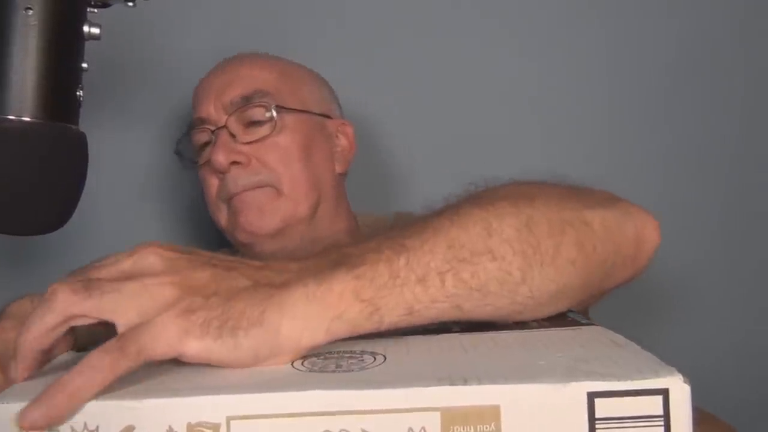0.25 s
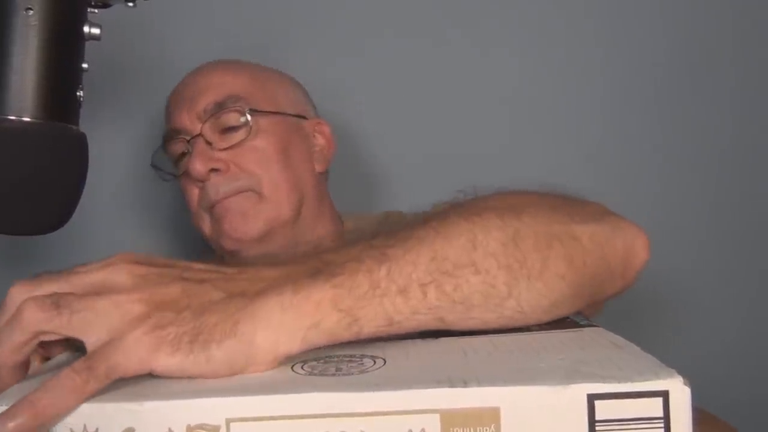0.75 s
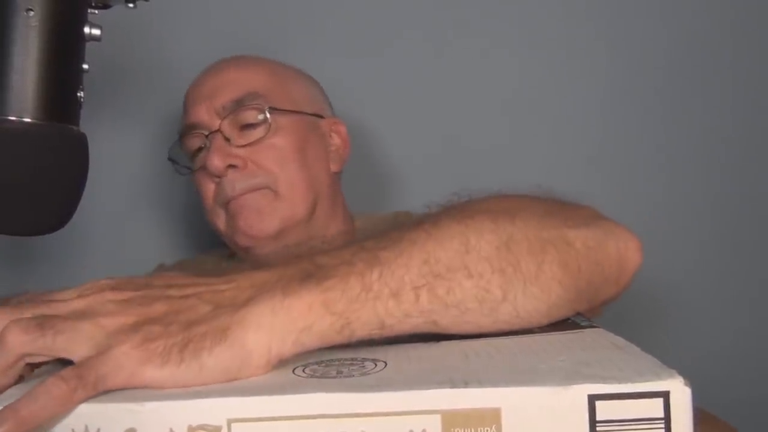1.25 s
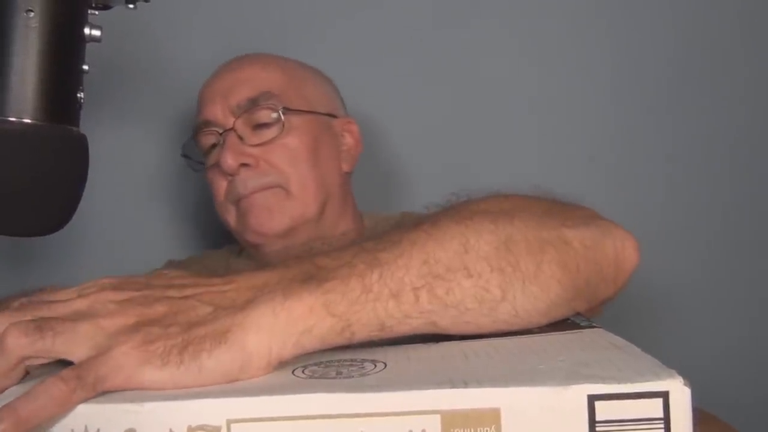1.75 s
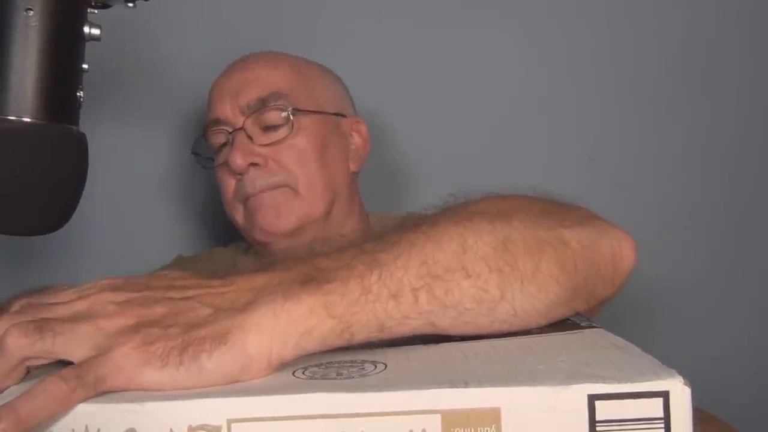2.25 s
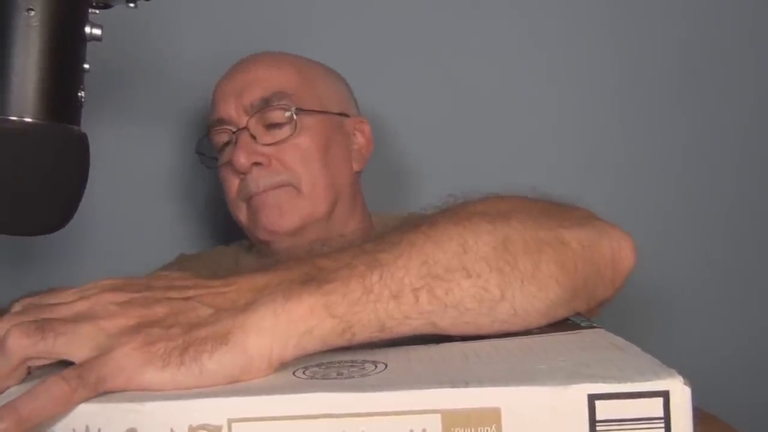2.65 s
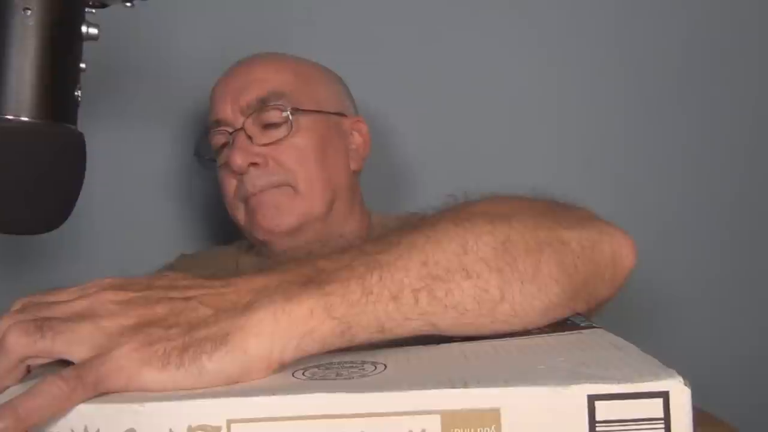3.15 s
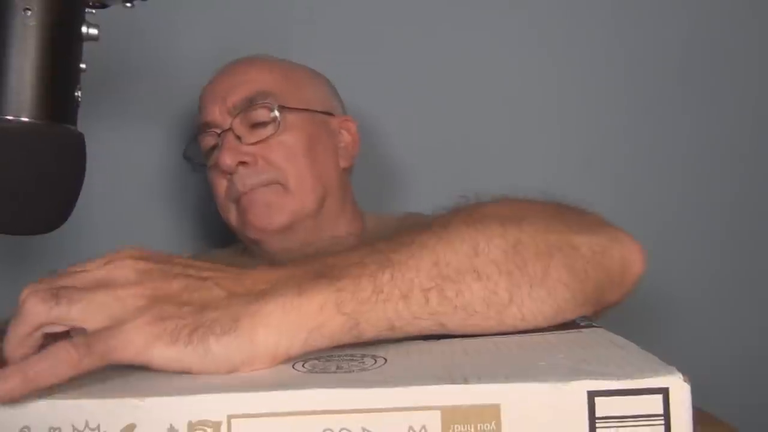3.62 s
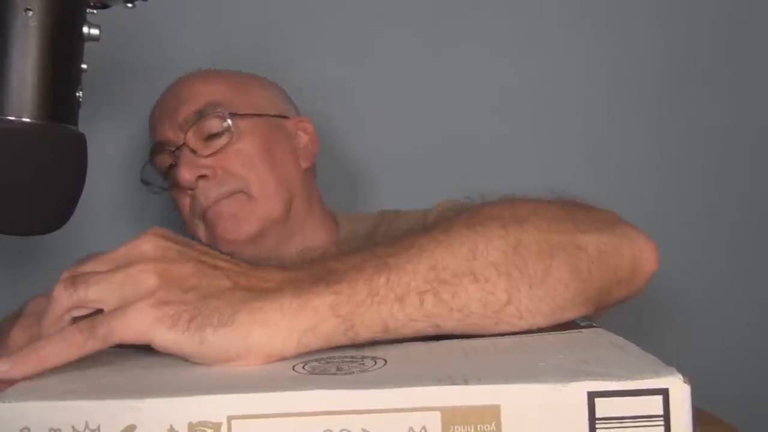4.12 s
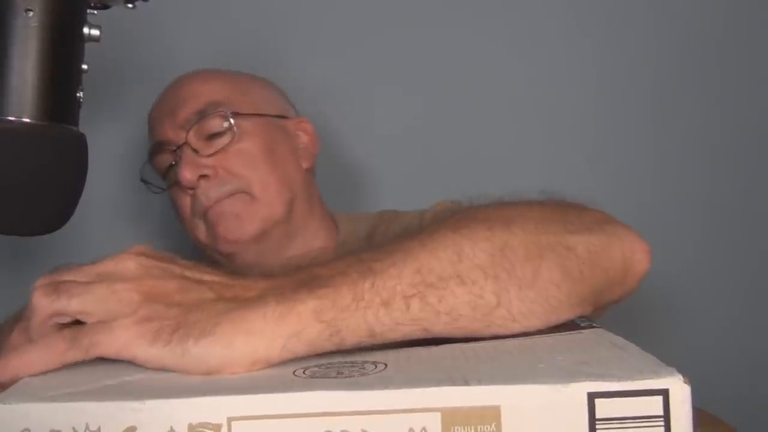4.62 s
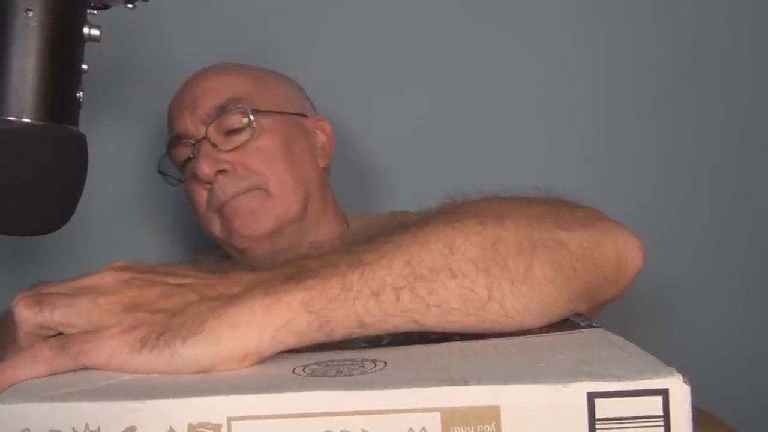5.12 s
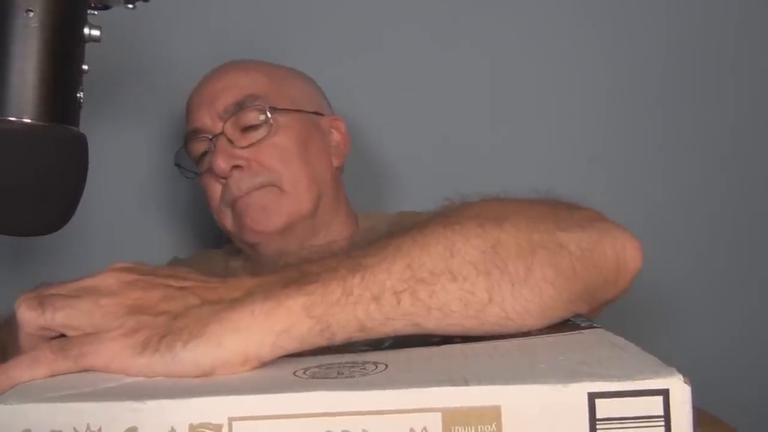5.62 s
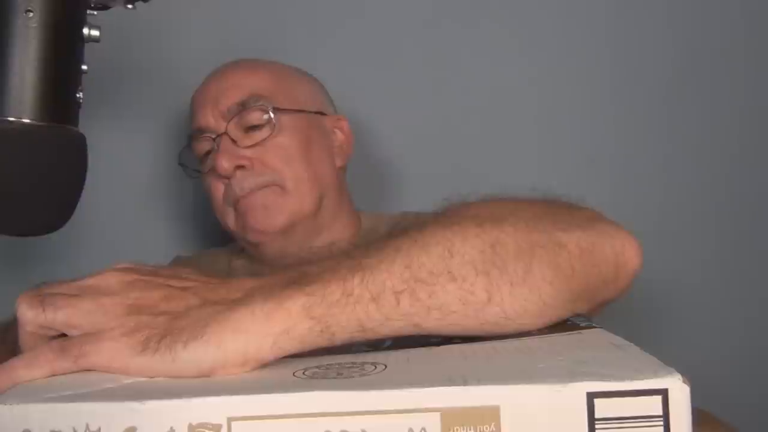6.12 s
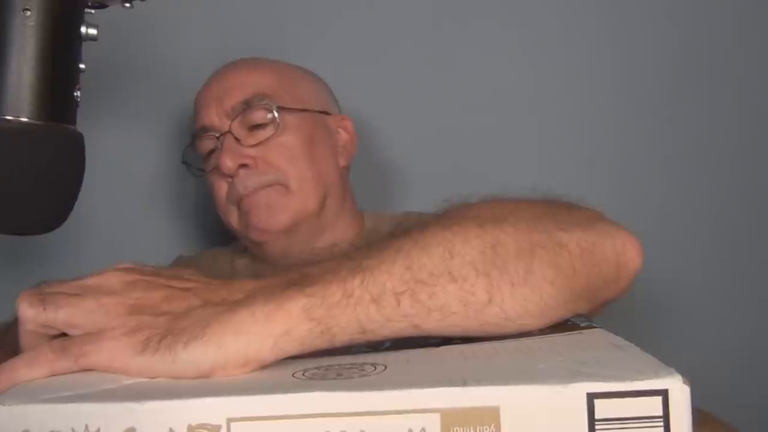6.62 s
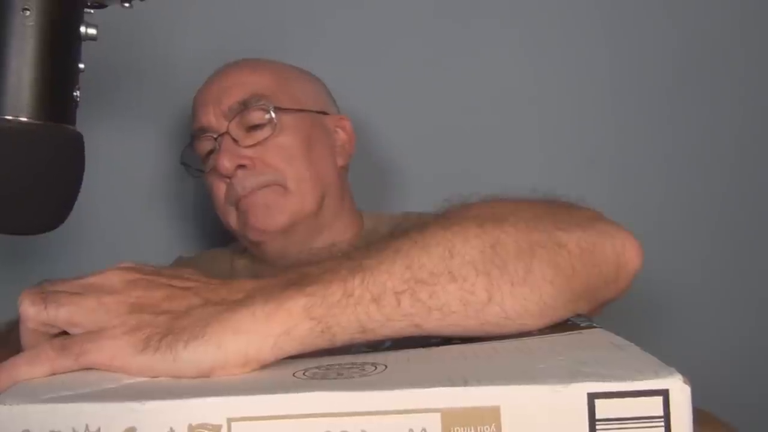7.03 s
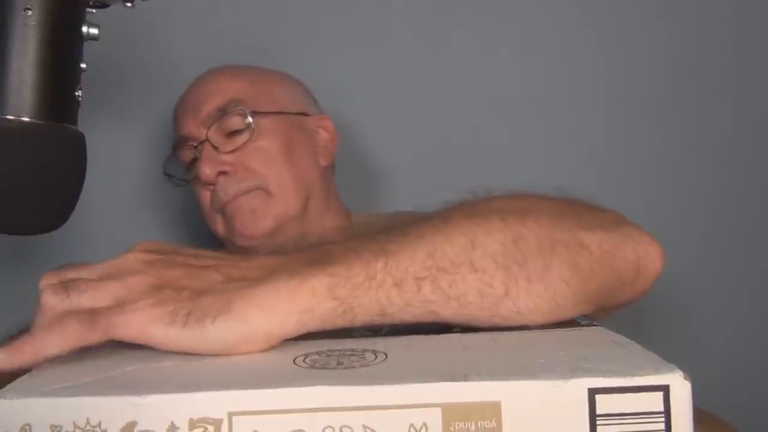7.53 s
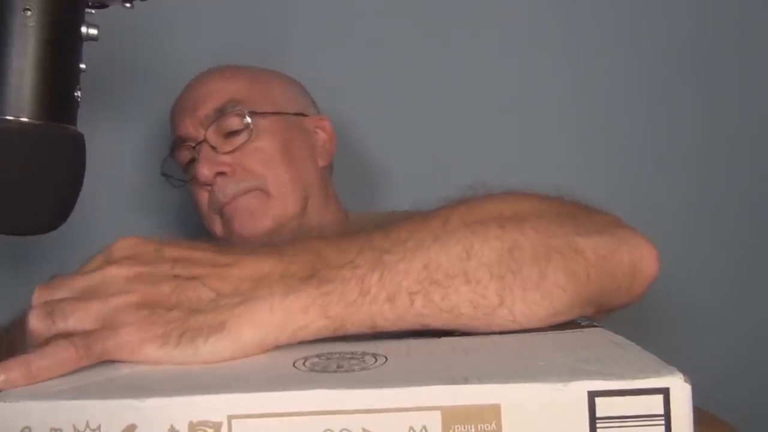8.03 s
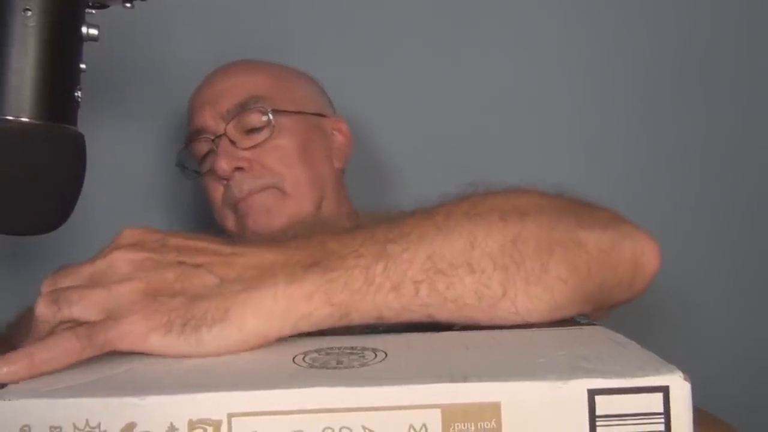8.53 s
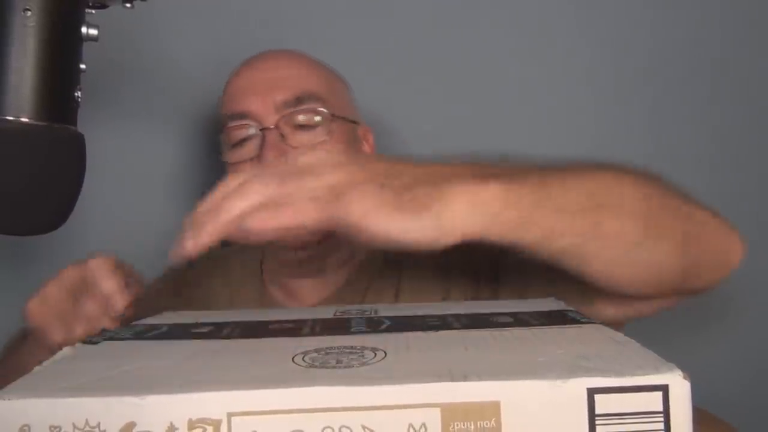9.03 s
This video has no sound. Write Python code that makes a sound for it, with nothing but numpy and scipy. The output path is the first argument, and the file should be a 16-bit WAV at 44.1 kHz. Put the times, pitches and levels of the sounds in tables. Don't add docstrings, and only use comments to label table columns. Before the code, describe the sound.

A close, dry sound of fingers on a corrugated cardboard box in a small quiet room, over faint low air noise and hiss. From 0 to 1.2 seconds, soft hollow fingertip taps fall in uneven clusters, with a firmer one near 0.8. At 1.44 a strong boxy knock lands, followed by grainy rubbing and fine nail ticks until about 3. Around 3.2 to 3.6 nails scrape across ridges, ending with a sharp bright click at 3.66. Sparse taps and quieter strokes follow from 4 to 5.4. Rubbing and crisp scratching grow busier from 5.5 to 7.5, with a tiny creak at 6.6 and bright fibre snaps around 7.05 and 7.14. Near 8 a pressed finger judders in a fast, strengthening stutter; at 8.14 the lid pops with one very loud, short boomy crack. Light taps, ticks and soft rubbing trail off through 9.3.

```python
import sys
import numpy as np
from scipy import signal
from scipy.fft import rfft, irfft, next_fast_len
from scipy.io import wavfile
from scipy.ndimage import uniform_filter1d

SR = 44100
rng = np.random.default_rng(int(sys.argv[2]) if len(sys.argv) > 2 else 0)


def elevation(decibels):
    levels = np.asarray(decibels, float)
    return 10 ** (levels / 20)


def waveform_to_disk(signal):
    frames = np.transpose(np.atleast_2d(signal))
    scaled = np.clip(frames, -1, 1) * 32767
    samples = np.round(scaled).astype(np.int16)
    wavfile.write(sys.argv[1], SR, samples)


N = 408807

# freq_hz, level_db_per_hz
AIR_SPECTRUM = [(20, 0.5), (55, -14), (108, -2.5), (174, -22.5), (240, -18.5), (1200, -32.5), (3000, -39),
                (15500, -48.5), (15900, -76.5)]
AIR_DB = -53.5
# freq_hz, level_db
WHINE = [(15628, -78), (15680, -76.5)]

# time_s, level_db
REST = [(0, -46.5), (0.5, -55.5), (1.3, -39), (1.6, -45), (2.0, -44), (2.5, -57.5), (2.95, -48.5),
        (3.5, -42.5), (4.05, -57.5), (4.5, -54), (4.8, -70), (5.3, -49.5), (5.7, -64), (6.1, -49.5),
        (7.1, -53.5), (7.65, -49), (8.6, -53), (9.05, -70.5)]
REST_RASP_DB, REST_HISS_DB = -21.5, -27
# peak_s, rise_s, fall_s, rasp_db, pad_over_nail_db
DRAGS = [(0.08, 0.078, 1, -58, -9), (0.364, 0.03, 1, -60, 9.5), (0.828, 0.14, 0.11, -53, 22),
         (1.078, 0.15, 0.12, -58, 21.5), (1.455, 0.078, 0.12, -43, 14), (1.671, 0.062, 0.26, -43.5, 7.5),
         (2.491, 0.14, 0.075, -49, 7.5), (3.212, 0.13, 0.39, -48, 7.5), (3.664, 0.041, 0.087, -41.5, 13),
         (3.93, 0.59, 0.1, -56, -30), (4.415, 0.056, 0.18, -54.5, 9.5), (4.899, 0.13, 0.34, -52, 13.5),
         (5.108, 0.026, 0.27, -49, 6), (5.518, .13, 0.075, -38, 5.5), (5.841, 0.093, 0.1, -35.5, 6),
         (6.174, 0.047, 0.16, -45, -4), (6.443, 0.084, 0.18, -47.5, 10), (6.698, 0.13, 0.12, -37, 9.5),
         (7.205, 0.049, 0.059, -43.5, 6.5), (7.443, 0.047, 0.28, -57.5, -2),
         (7.827, 0.22, 0.51, -59.5, 15.5), (8.13, 0.26, 0.043, -50, 14), (8.2, .05, 0.24, -47.5, 12.5),
         (8.739, 0.055, 0.19, -47, 5.5)]
# peak_s, half_length_s, rasp_db, pad_over_nail_db
FLICKS = [(0.638, 0.03, -65, -7), (1.716, .05, -54, -4), (1.933, 0.085, -47, 9.5), (2.148, 0.1, -57, 11),
          (2.291, 0.041, -54.5, 13), (2.639, 0.06, -42, 2), (2.875, 0.11, -49.5, 0),
          (3.01, 0.058, -54.5, 12), (4.164, 0.078, -58, -16), (4.302, 0.061, -53, 10),
          (4.552, 0.098, -55, 19.5), (4.69, 0.19, -56, 2), (5.34, 0.069, -50, 10),
          (5.666, 0.082, -50.5, 11.5), (5.99, 0.066, -55, -5), (6.314, 0.064, -46, 1.5),
          (6.578, .06, -56, 6), (3.315, 0.026, -56, 0), (3.413, 0.058, -53.5, 2), (3.541, 0.052, -51.5, 1),
          (7.43, .012, -49, 10), (6.863, 0.092, -53.5, 9), (7.013, 0.069, -40, 5.5),
          (7.3, 0.091, -61.5, 18), (7.37, 0.18, -54, 12.5), (7.837, 0.048, -52.5, -7),
          (8.527, 0.24, -58.5, 12), (8.938, 0.09, -48.5, 2), (9.213, 0.046, -64, 2),
          (9.269, 0.024, -64, 14)]
SWELL_POWER = 1.128
PAD_LINGER = 0.98
HISS_DB, HISS_PER_PAD_DB = -3, -0.1967
# freq_hz, level_db_per_hz
RASP_SPECTRUM = [(330, -13), (560, -9), (659, -9), (1110, -13.5), (1630, -10.5), (1810, -16), (2190, -18.5),
                 (2560, -19.5), (3600, -25.5), (4680, -33.5), (7920, -120)]
# freq_hz, level_db_per_hz
HISS_SPECTRUM = [(1650, -20), (2500, -8), (3400, -11), (4400, -4.5), (5120, 2.5), (5560, -3), (6340, 2),
                 (7490, -1), (9820, 0), (14600, -6.5), (15600, -14), (16100, -55)]

# freq_hz, level_db, t60_s
PANEL_MODES = [(45, -9, 0.15), (68, -3.5, 0.013), (101, 6, 0.037), (152, -6, 0.1), (203, -4.5, 0.08),
               (250.6, 1.5, 0.054), (315.7, -7.5, 0.067), (406, 1, 0.064), (475.3, -6.5, 0.1)]
# freq_hz, level_db, t60_s
KNOCK_MODES = [(536, -2, 0.02), (656, -10, 0.029), (791, 4.5, 0.029), (880, 1, 0.016), (1047, -3.5, 0.036),
               (1270, -4.5, .02)]
# freq_hz, level_db, t60_s
EDGE_MODES = [(1430, -9, 0.033), (1583, 7.5, 0.034), (1900, 6.5, 0.014), (2298, -4, 0.026),
              (2628, -5, 0.052), (3130, -4.5, 0.019)]
# start_s, knock_peak_db, lead_mode_hz, panel_rel_db, edge_rel_db
KNOCKS = [(0.352, -35, 118, -5.5, -14), (0.627, -35, 241, -15, -9), (0.819, -21, 174, -0.5, -14.5),
          (1.085, -33, 398, 0, -40), (1.4403, -15, 250, 8.5, -8.5), (1.4606, -34.5, 256, 22.5, 0),
          (1.657, -44.5, 271, 22.5, 11), (1.663, -37.5, 247, 23.5, 3), (3.206, -37, 250, 12.5, 1),
          (3.246, -51.5, 252, 24, -5), (3.661, -24.5, 300, 6, -8), (3.845, -42, 125, 19, -3),
          (4.401, -35, 75.4, 9.5, -15), (4.771, -36, 415, 5.5, -12), (5.131, -37.5, 117, 9.5, -2.5),
          (5.512, -30, 260, 3, 4.5), (5.83, -28.5, 230, 7, -2.5), (6.703, -36, 124, 9, 3.5),
          (6.994, -35, 105, 5, -5), (7.439, -33.5, 460, 2.5, 3), (8.1437, -11, 250, -12, 2),
          (8.1455, -17, 252, -2, 2), (8.755, -35, 76.3, 10, -10)]
# start_s, knock_peak_db, panel_rel_db
CENTRE_TAPS = [(0.069, -48, 9), (0.43, -41, -21), (0.572, -42, 5), (0.653, -45, 18), (0.741, -41, 11.5),
               (1.108, -39.5, 6), (1.203, -38, 0), (1.959, -53, 17), (5.037, -44, 9.5), (5.334, -44, 9.5),
               (6.424, -51, 15.5), (6.669, -32, 2), (7.37, -37, 4.5), (7.481, -47, 19.5),
               (7.784, -46, 14.5), (7.817, -44.5, 17), (8.371, -51, 21), (8.512, -55, 18),
               (8.729, -40, 5.5), (8.806, -34, -5), (8.954, -51.5, 15)]
# start_s, knock_peak_db, panel_rel_db
HALFWAY_TAPS = [
    (1.153, -55, 2),
    (1.629, -57, 19),
    (2.618, -47, 4),
    (2.779, -53, 12.5),
    (2.817, -58, 12),
    (3.009, -53.5, 13),
    (4.118, -50, 12.5),
    (5.016, -51, 4),
    (6.604, -60, 2),
    (7.916, -45.5, 10),
]
# start_s, knock_peak_db, panel_rel_db
RIM_TAPS = [(0.463, -45.5, 6), (0.593, -43.5, 6), (0.889, -34, -13), (0.903, -37, 0), (0.918, -37, 0.5),
            (1.05, -38.5, 2), (2.419, -38.5, 3.5), (4.25, -43, 3.5), (4.57, -41.5, 5), (4.963, -36, 2.5),
            (5.423, -45, 9), (6.162, -44, 3), (6.869, -43.5, 3.5), (7.185, -41, 2.5), (8.928, -44, -1)]
# start_s, knock_peak_db, panel_rel_db
JUDDER = [
    (7.974, -41, 14.5),
    (7.992, -44.5, 9),
    (8.004, -45.5, 12),
    (8.022, -44, 22),
    (8.038, -39.5, 11.5),
    (8.061, -38.5, 18.5),
    (8.073, -35, 8.5),
    (8.097, -33, 13.5),
    (8.116, -37.5, 17.5),
]
# start_s, knock_peak_db, panel_rel_db
DEEP_TAPS = [
    (0.495, -41, 9),
    (0.725, -41, 2),
    (0.786, -39, 11),
    (0.995, -41, 1),
    (4.541, -36.5, 4),
    (5.168, -40, 7),
]
# lead_mode_hz, edge_rel_db
PLACES = [(110, -7), (250, -3), (446, -10), (125, -9), (74, -10)]

# freq_hz, level_db_per_hz
CRUNCH_SPECTRUM = [(300, -14.5), (800, 0.1), (1600, -2), (2600, -5), (4500, -13), (9000, -23),
                   (15000, -32.5)]
CRUNCH_DB, CRUNCH_RISE_S, CRUNCH_T60_S = -15.5, 0.001, 0.054
SETTLE_DB, SETTLE_T60_S = -10.5, 0.45

# freq_hz, t60_s
ROOM_DECAY = [(100, 0.042), (500, 0.28), (2000, 0.096), (8000, 0.33), (15000, 0.063)]

# start_s, length_s, centre_hz,
# width_hz, level_db
SCUFFS = [(3.74, 0.068, 2400, 1400, -49.5), (4.855, 0.064, 2500, 2800, -47.5),
          (6.49, 0.11, 2200, 1700, -50), (6.595, 0.056, 810, 820, -49), (8.144, .0022, 6400, 2400, -8),
          (8.144, .004, 2500, 900, -16), (8.138, .008, 5000, 6000, -48), (3.203, .012, 2600, 1000, -39),
          (5.09, 0.029, 4200, 3700, -44.5), (8.72, 0.026, 2200, 2700, -42), (1.34, .11, 1500, 1800, -55),
          (8.797, 0.018, 3600, 400, -52), (1.7, 0.062, 2600, 900, -47), (4.855, 0.064, 4200, 1400, -53),
          (0.35, 0.011, 1100, 650, -41), (.625, 0.009, 1200, 730, -40), (.885, 0.047, 800, 440, -44.5),
          (8.1455, 0.013, 900, 410, -20), (1.4378, 0.0067, 2450, 460, -26), (1.4385, .007, 4000, 370, -36),
          (1.4385, 0.0066, 6300, 3700, -29.5), (1.442, .024, 2100, 900, -35.5),
          (1.454, .011, 8000, 6100, -39), (1.655, 0.0069, 3900, 500, -40), (1.2, 0.1, 1500, 1800, -57),
          (8.1, 0.056, 2900, 910, -55), (3.28, 0.058, 2300, 900, -54.5), (3.39, 0.066, 2400, 900, -52.5),
          (1.652, 0.015, 2400, 780, -35), (7.3, .022, 7600, 5200, -51), (8.793, 0.024, 2530, 290, -45),
          (1.9, 0.097, 2300, 790, -51)]

# start_s, peak_db
DULL_TICKS = [(0.5696, -33), (0.6268, -45), (0.7401, -38), (0.7725, -42), (0.7855, -43), (1.0199, -46),
              (1.0573, -38), (1.0853, -38), (1.234, -43), (0.819, -23), (0.9931, -37), (1.2023, -37.5),
              (1.44, -17), (1.655, -24.5), (3.2048, -26.5), (4.6322, -44), (5.1013, -27), (5.508, -27),
              (6.4062, -38.5), (7.369, -25), (7.4393, -25), (8.0724, -37), (8.097, -34), (8.116, -44.5),
              (8.7305, -24.5), (9.2577, -28)]
# start_s, peak_db
SIDE_TICKS = [(0.43, -31.5), (2.1004, -40), (3.1522, -42), (3.6625, -6.5), (3.847, -42), (4.117, -34),
              (4.6713, -33), (4.9618, -26.5), (5.439, -38), (5.9777, -40), (6.707, -20), (8.1443, -17),
              (9.2018, -43.5), (9.208, -32.5)]
# start_s, peak_db
TIP_TICKS = [(1.957, -27), (2.13, -30), (2.242, -33), (2.3083, -32), (2.437, -35.5), (2.4625, -33),
             (2.4984, -30.5), (2.6521, -24), (4.7149, -34), (5.2094, -34), (5.3395, -32.5), (5.7912, -34),
             (5.8301, -19.5), (6.138, -33), (6.234, -27.5), (6.9563, -38), (8.0381, -34), (8.0621, -36),
             (1.4385, -20), (8.144, -14)]
# start_s, peak_db
FIBRE_SNAPS = [
    (3.3948, -19),
    (4.4006, -33.5),
    (6.8097, -34),
    (7.047, -17.5),
    (7.1397, -17.5),
    (7.153, -27.5),
    (8.553, -40),
]
TICK_HZ = [3350, 5000, 7080, 10400]

# freq_hz, level_db, t60_s
SKIN_MODES = [(900, -7, 0.0099), (1590, -0.5, 0.013), (2520, 1, 0.013), (3900, -11, 0.0064),
              (5040, -3, .008), (6160, 0, 0.0094), (7200, -3, 0.0068), (9300, -3, 0.0063)]
# start_s, peak_db, tilt_db_per_octave
RIDGES = [(0.5144, -48, 0), (0.5264, -43, 0), (0.7567, -44, 0), (0.806, -29, 3), (3.2286, -32, 0),
          (3.246, -31, 3), (3.2564, -41, 0), (3.2864, -41, 0), (3.3089, -35, 0), (3.3224, -42, 0),
          (3.3364, -44, 0), (3.4054, -35, 3), (3.437, -39, 2), (3.4557, -47, 0), (3.4814, -46, 0),
          (3.5164, -35, 0), (3.5264, -39, 0), (3.5464, -39, 0), (3.563, -35, 5), (3.6074, -48, 0),
          (5.8214, -31, 3), (5.8444, -28, 0), (5.8554, -32, 0), (6.4514, -34, 0), (6.505, -32, -5),
          (6.6184, -42, 5), (6.6544, -34, 0), (6.6703, -22, 1), (6.6851, -19.5, 2), (6.7174, -32, 0),
          (6.7304, -26, 2), (6.739, -31, 0), (7.002, -28, 1), (7.0144, -32, 0), (7.0204, -32, 0),
          (7.1984, -31, -6), (7.2154, -35, -5), (7.2779, -45, 2), (7.3254, -42, 0), (7.3954, -39, 0),
          (7.426, -28, -1), (7.4844, -40, 0),
          (1.0744, -35, 2), (1.4234, -42, 1), (1.7364, -36, 2), (2.2697, -45, 2), (5.4535, -34, 2),
               (5.4664, -36, 2), (5.4734, -34, 2), (5.5144, -22, 2), (5.5374, -33, 2), (5.7114, -50, 2),
               (5.7179, -48, 2), (5.9044, -42, 2), (5.9244, -50, 2), (7.9189, -42, 2), (7.9494, -42, 2),
               (7.9844, -45, 3), (8.0114, -40, 2), (8.0381, -38, 4), (8.0844, -40, 3), (8.6822, -52, 2),
               (8.7414, -38, 2), (8.9286, -41, 2), (8.9564, -41, 2)]
# start_s, peak_db, tilt_db_per_octave
DRY_RIDGES = [
    (4.539, -42, 1),
    (4.548, -36, 0),
    (4.570, -36, 1),
    (4.794, -44, 3),
    (4.808, -43, 3),
    (7.027, -32, 4),
    (1.628, -46, 1),
    (9.2577, -34, -3),
]

# start_s, length_s, pitch_hz, peak_db
HUMS = [
    (2.61, .08, 250, -35),
    (2.79, .06, 250, -31),
    (3.01, .045, 240, -37),
    (6.13, .1, 210, -42),
]

# start_s, length_s, slips_per_s, peak_db
CREAKS = [
    (6.6, .036, 255, -31),
]
CREAK_PULSE_S = .00027

# freq_hz, level_db, t60_s
JUDDER_SKIN_MODES = [(400, 0, .03), (1600, 2, .026), (1800, -5, .016)]
JUDDER_SKIN_DB = -2

# freq_hz, level_db, t60_s
SNAP_MODES = [(73, 4, .08), (170, -12.5, 0.045), (247, 8, .08), (330, -9.5, .03), (402, -5, .04),
              (723, 2, .035), (790, 1, 0.04), (900, -1, .028), (1010, -10, .025), (1500, -6.5, 0.029),
              (1711, -11, .03), (1870, -13.5, .03), (2380, -5, .018), (2625, -7, .02)]
SNAP_S, SNAP_DB, SNAP_RISE_CYCLES, SNAP_HOLD_S = 8.145, 3, 0.54, .009


def evened(x):
    return x / np.sqrt(np.mean(x ** 2) + 1e-20)


def read(points, hz):
    table_hz, value = np.transpose(points)
    return np.interp(np.log(hz + 1), np.log(table_hz + 1), value)


def add(mix, start_s, sound):
    part = mix[round(start_s * SR):][:len(sound)]
    part += sound[:len(part)]


def colour(x, points):
    size = next_fast_len(len(x))
    gain = elevation(read(points, np.fft.rfftfreq(size, 1 / SR)))
    return evened(irfft(rfft(x, size) * gain, size)[:len(x)])


def ring(modes, extra_db, phase, rise_s, detune=1):
    t = np.arange(SR // 5)[:, None] / SR
    hz, db, t60_s = np.transpose(modes)
    waves = elevation(db + extra_db - 60 * t / t60_s) * np.sin(2 * np.pi * hz * detune * t + phase)
    out = (waves * (1 - np.exp(-t / rise_s))).sum(1)
    return out / abs(out).max()


def background():
    t = np.arange(N) / SR
    whine = sum(elevation(db) * np.sqrt(2) * np.sin(2 * np.pi * hz * t) for hz, db in WHINE)
    return elevation(AIR_DB) * colour(rng.standard_normal(N), AIR_SPECTRUM) + whine


def effort():
    t = np.arange(0, N + 64, 64) / SR
    rest = elevation(np.interp(t, *np.transpose(REST)))
    pad, rasp, hiss = rest, rest * elevation(REST_RASP_DB), rest * elevation(REST_HISS_DB)
    flicks = [(s, half_s, half_s, db, pad_db) for s, half_s, db, pad_db in FLICKS]
    for s, rise_s, fall_s, db, pad_db in DRAGS + flicks:
        away = np.where(t < s, (s - t) / rise_s, (t - s) / fall_s) ** SWELL_POWER
        nail = elevation(db) * np.clip(1 - away, 0, 1) ** 2
        pad = pad + elevation(db + pad_db) * np.clip(1 - away / PAD_LINGER, 0, 1) ** 2
        rasp = rasp + nail
        hiss = hiss + nail * elevation(HISS_DB + HISS_PER_PAD_DB * pad_db)
    return [np.interp(np.arange(N) / SR, t, level) for level in (pad, rasp, hiss)]


def patchy(x, patch_db, frames, bins):
    z = signal.stft(x, nperseg=1024)[2]
    field = rng.standard_normal(z.shape)
    field = evened(uniform_filter1d(uniform_filter1d(field, frames, 1), bins, 0))
    return evened(signal.istft(z * elevation(patch_db * field), nperseg=1024)[1][:N])


def strokes():
    pad, rasp, hiss = effort()
    clumps = evened(uniform_filter1d(uniform_filter1d(rng.standard_normal(N), 300), 300))
    grain = evened(uniform_filter1d(uniform_filter1d(rng.standard_normal(N), 50), 50))
    dense = rng.standard_normal(N) * elevation(2.37 * clumps + 0.98 * grain)

    slip_size = elevation(3.5 * np.minimum(rng.exponential(1, N), 2.5))
    slips = rng.standard_normal(N) * slip_size * (rng.random(N) < 400 / SR)
    slips = evened(signal.lfilter([1], [1, -.8], slips) * rng.standard_normal(N))

    panel_hz = np.transpose(PANEL_MODES)[0]
    rub_db = -11.0 * (panel_hz < 90) - 6.0 * (panel_hz > 350)
    body = ring(PANEL_MODES, rub_db, rng.uniform(0, 2 * np.pi, len(PANEL_MODES)), 0.00046)
    rubbing = pad * patchy(dense + 0.68 * slips, 5.0, frames=3, bins=3)
    low = signal.oaconvolve(rubbing, body / np.linalg.norm(body))[:N]

    fibres = patchy(dense + 0.4 * slips, 1.9, frames=5, bins=24)
    nail_rasp = elevation(-1.0) * rasp * colour(fibres, RASP_SPECTRUM)
    nail_hiss = elevation(-1.5) * hiss * colour(fibres, HISS_SPECTRUM)
    return elevation(-4.5) * low + nail_rasp + nail_hiss


def all_taps():
    rows = list(KNOCKS)
    for place_taps, (hz, edge_db) in zip([CENTRE_TAPS, HALFWAY_TAPS, RIM_TAPS, JUDDER, DEEP_TAPS], PLACES):
        rows += [(s, db, hz, panel_db, edge_db) for s, db, panel_db in place_taps]
    return sorted(rows)


def taps():
    out, rows = np.zeros(N), all_taps()
    luck = rng.standard_normal((len(rows), 3, len(PANEL_MODES)))
    panel_hz = np.transpose(PANEL_MODES)[0]
    knock_n, edge_n = len(KNOCK_MODES), len(EDGE_MODES)
    pressed = 0.38 + 0.83 * np.exp(-np.arange(SR // 5) / SR / 0.017)
    for (s, db, hz, panel_db, edge_db), (share, phase, spot) in zip(rows, luck):
        detune = 1 + 0.049 * spot[:edge_n]
        lead_db = -9.0 * abs(np.log2(panel_hz / hz)) + 2.0 * share - 7.0 * (panel_hz < hz / 2)
        knock = ring(KNOCK_MODES, 2.1 * share[:knock_n], 1.6 * phase[:knock_n], 0.00098, detune)
        panel = ring(PANEL_MODES, lead_db, .5 * phase + .94, 0.0026)
        edge = ring(EDGE_MODES, 3.2 * share[:edge_n], 2.0 * phase[:edge_n], 0.0016, detune[::-1])
        sound = knock + elevation(panel_db) * panel + elevation(edge_db) * edge
        add(out, s, elevation(db) * sound * pressed)
    return out


def crunch():
    out, rows, t = np.zeros(N), all_taps(), np.arange(8192) / SR
    dying = elevation(-60 * t / CRUNCH_T60_S) + elevation(SETTLE_DB - 60 * t / SETTLE_T60_S)
    shape = (1 - np.exp(-t / CRUNCH_RISE_S)) * elevation(CRUNCH_DB) * dying
    for (s, db, _, _, edge_db), noise in zip(rows, rng.standard_normal((len(rows), len(t)))):
        add(out, s, elevation(db + edge_db) * shape * colour(noise, CRUNCH_SPECTRUM))
    return out


def room(x):
    echoes = np.zeros(SR // 2)
    at = np.arange(200, SR // 2 - 20, 20)
    echoes[at + rng.integers(0, 20, len(at))] = rng.choice([-1., 1.], len(at))
    hz, t, z = signal.stft(echoes, SR, nperseg=256)
    decay = elevation(-60 * t / read(ROOM_DECAY, hz)[:, None])
    tail = signal.istft(z * decay, SR, nperseg=256)[1]
    return signal.oaconvolve(x, tail / np.linalg.norm(tail))[:N]


def scuffs():
    out = np.zeros(N)
    for s, length_s, hz, width_hz, db in SCUFFS:
        grit = rng.standard_normal((2, SR // 8))[:, :round(length_s * SR)]
        rough = grit[0] * elevation(0.97 * evened(uniform_filter1d(grit[1], 90)))
        band = evened(signal.filtfilt(*signal.iirpeak(hz, hz / width_hz, SR), rough))
        add(out, s, elevation(db) * band * signal.windows.hann(len(band)))
    return out


def all_ticks():
    kinds = zip([DULL_TICKS, SIDE_TICKS, TIP_TICKS, FIBRE_SNAPS], TICK_HZ)
    return sorted((s, db, hz) for rows, hz in kinds for s, db in rows)


def ticks():
    out, rows, t = np.zeros(N), all_ticks(), np.arange(1024) / SR
    bins_hz = np.fft.rfftfreq(len(t), 1 / SR)
    for (s, db, hz), noise in zip(rows, rng.standard_normal((len(rows), len(t)))):
        crack = noise * (elevation(-60 * t / 0.013) * 0.2 + 0.5 * np.exp(-t / 0.000073))
        shape_db = -7.0 * abs(np.log2((bins_hz + 50) / hz)) ** 0.91
        shape_db -= 2.4 * (bins_hz / 10000) ** 3 * (10000 / hz - .9)
        shape_db -= 5.8 * hz / 10000 * np.clip(np.log2(hz / (bins_hz + 50)) - .6, 0, None)
        crack = irfft(rfft(np.roll(crack, 44)) * elevation(shape_db))
        add(out, s - .0004, elevation(db) * crack / abs(crack).max())
    return out


def ridges(rows):
    out, octaves = np.zeros(N), np.log2(np.transpose(SKIN_MODES)[0] / 3000)
    luck = rng.standard_normal((len(rows), 3, len(SKIN_MODES)))
    for (s, db, tilt_db), (share, phase, spot) in zip(rows, luck):
        skin = ring(SKIN_MODES, tilt_db * octaves + 1.8 * share, 2 * phase, .0004, 1 + .02 * spot)
        add(out, s, elevation(db - 5.5) * skin[:1500])
    return out


def hums():
    out = np.zeros(N)
    for s, length_s, hz, db in HUMS:
        t = np.arange(0, length_s, 1 / SR)
        add(out, s, elevation(db) * np.sin(2 * np.pi * hz * t) * signal.windows.hann(len(t)))
    return out


def creaks():
    out = np.zeros(N)
    x = np.arange(-200, 400) / SR / CREAK_PULSE_S
    push = np.exp(-x ** 2 / 2) - .3 * np.exp(-(x / 4.0 - .8) ** 2)
    for s, length_s, rate_hz, db in CREAKS:
        for slip_s in np.arange(0, length_s, 1 / rate_hz):
            grip = np.minimum(.4 + slip_s / .006, 1)
            add(out, s + slip_s - 200 / SR + .0012, elevation(db) * grip * push)
    return out


def judder_skin():
    out = np.zeros(N)
    for s, db, panel_db in JUDDER:
        add(out, s, elevation(db + panel_db / 2 + JUDDER_SKIN_DB) * ring(JUDDER_SKIN_MODES, 0, 0, .0008))
    return out


def snap():
    out, t, hz = np.zeros(N), np.arange(SR // 5) / SR, np.transpose(SNAP_MODES)[0]
    free = 0.24 + 0.97 / (1 + (t / SNAP_HOLD_S) ** 6)
    lid = ring(SNAP_MODES, 0, rng.uniform(-0.9, 1, len(hz)), SNAP_RISE_CYCLES / hz)
    add(out, SNAP_S, elevation(SNAP_DB) * free * lid)
    return out


def scene():
    box = taps() + ticks() + strokes() + scuffs() + snap()
    box += ridges(RIDGES) + creaks() + judder_skin() + hums()
    box = signal.lfilter(*signal.butter(2, 42, "high", fs=SR), box)
    heard = box + elevation(-19.0) * room(box) + background() + crunch() + ridges(DRY_RIDGES)
    return np.array([heard, heard])


def low_pass(x):
    return signal.sosfilt(signal.butter(12, 16790, fs=SR, output="sos"), x)


def record(dry):
    rounded = dry / (1 + dry ** 6) ** (1 / 6)
    lowpass = signal.firwin(255, 16400, window=("kaiser", 9), fs=SR)
    heard = signal.oaconvolve(rounded, lowpass[None], "same")
    late = np.roll(heard[1], 1)
    highpass = signal.butter(1, 350, "high", fs=SR, output="sos")
    side = signal.sosfiltfilt(highpass, heard[0] - late) / 2
    mix = (heard[0] + late) / 2 + np.array([side, -side])
    return low_pass(mix)


dry = scene()
out = record(dry)
waveform_to_disk(out)
```